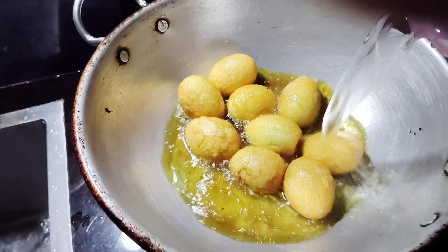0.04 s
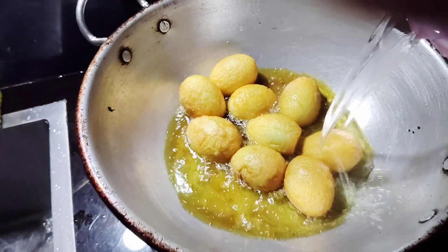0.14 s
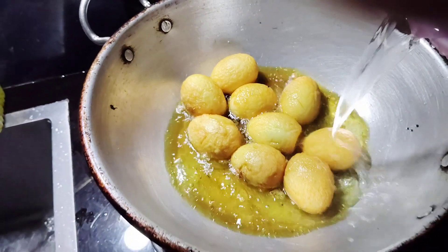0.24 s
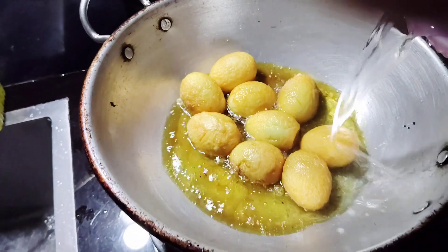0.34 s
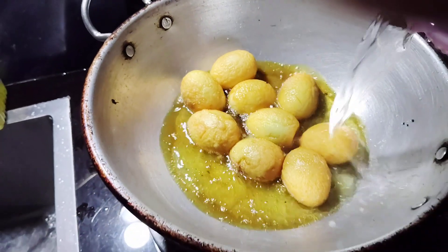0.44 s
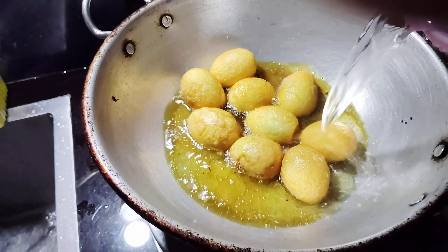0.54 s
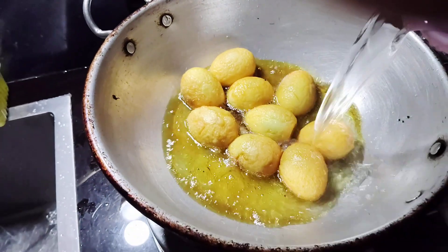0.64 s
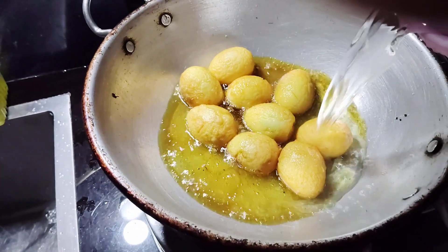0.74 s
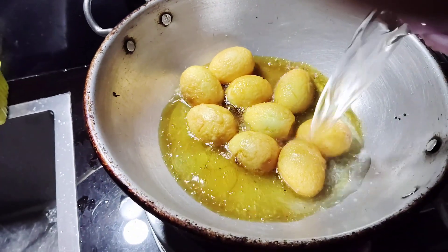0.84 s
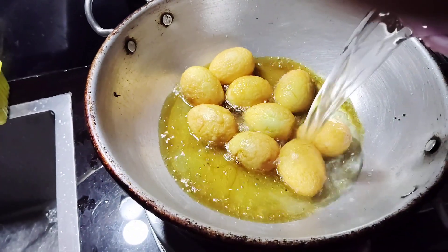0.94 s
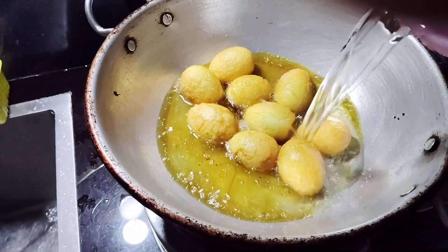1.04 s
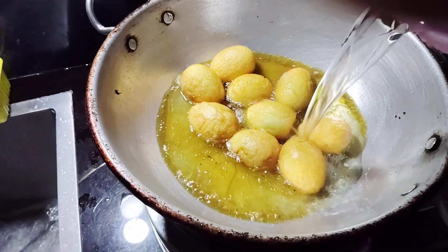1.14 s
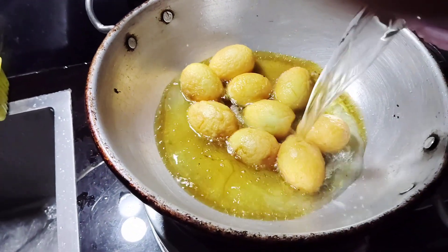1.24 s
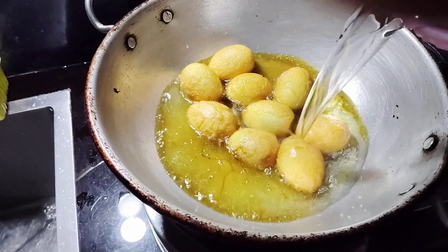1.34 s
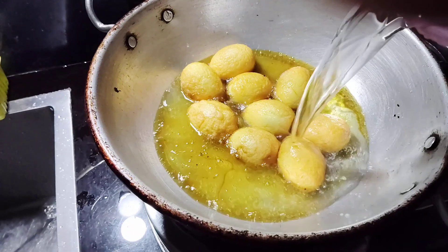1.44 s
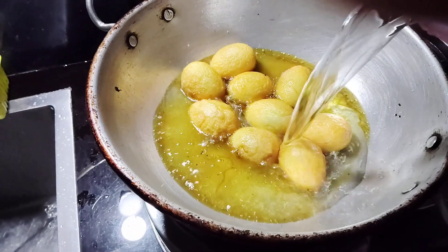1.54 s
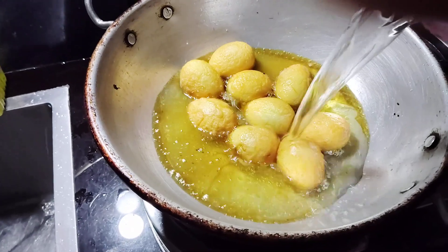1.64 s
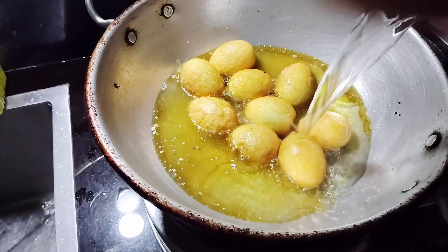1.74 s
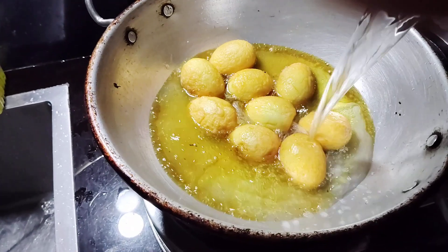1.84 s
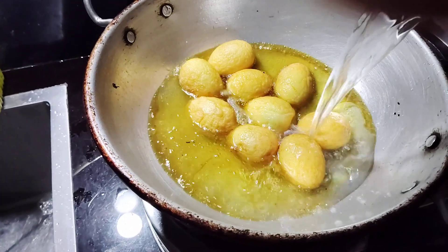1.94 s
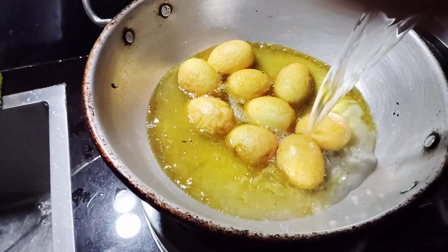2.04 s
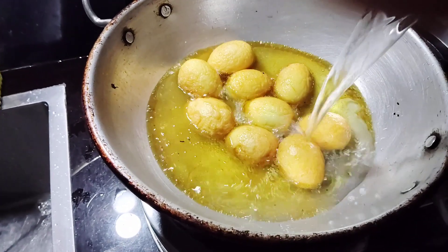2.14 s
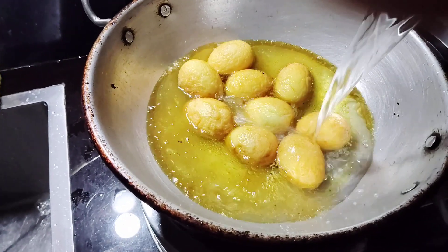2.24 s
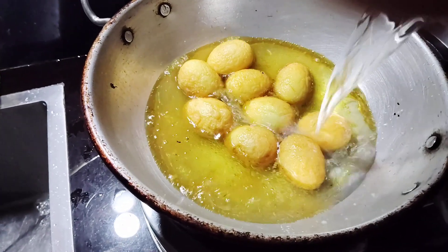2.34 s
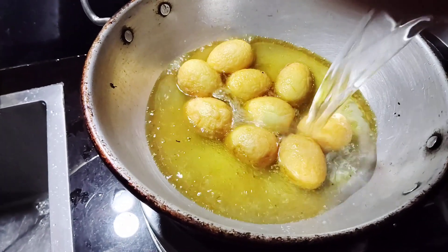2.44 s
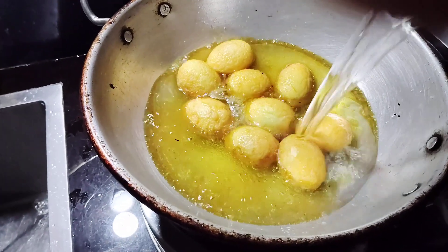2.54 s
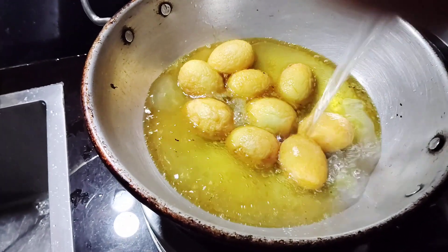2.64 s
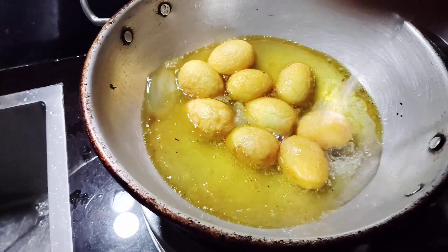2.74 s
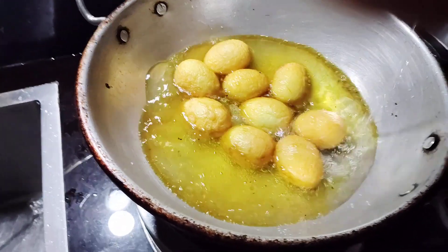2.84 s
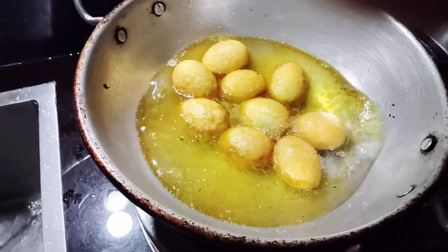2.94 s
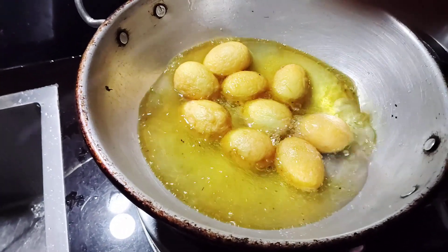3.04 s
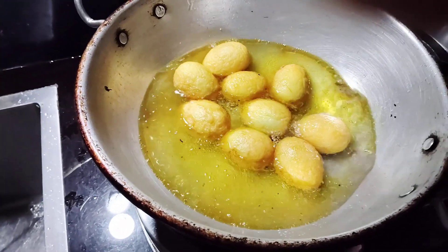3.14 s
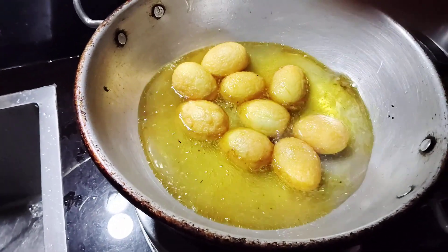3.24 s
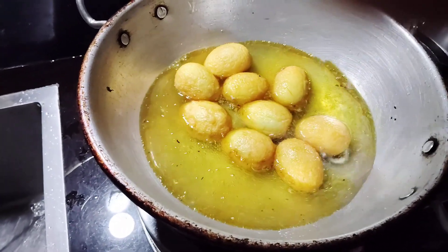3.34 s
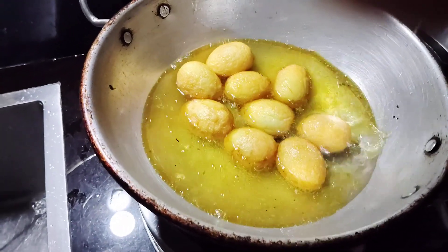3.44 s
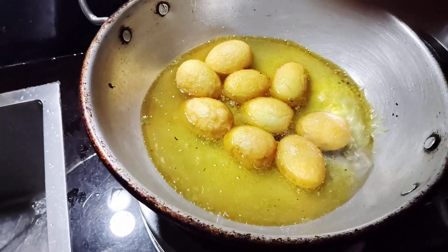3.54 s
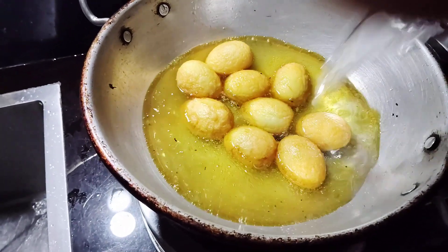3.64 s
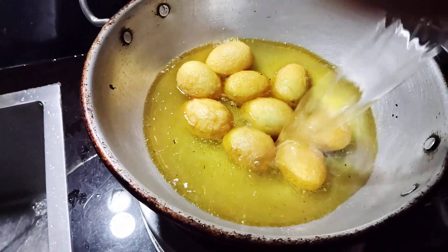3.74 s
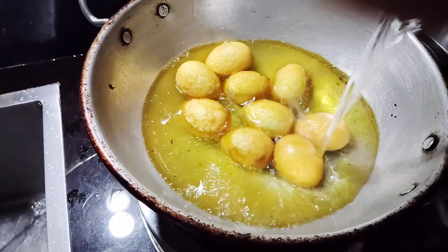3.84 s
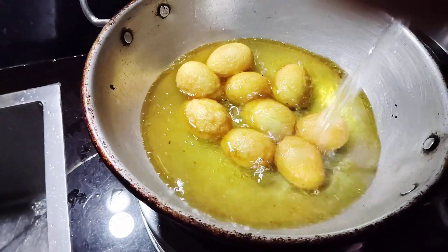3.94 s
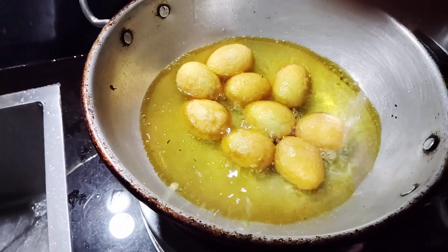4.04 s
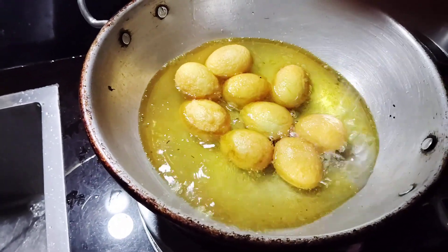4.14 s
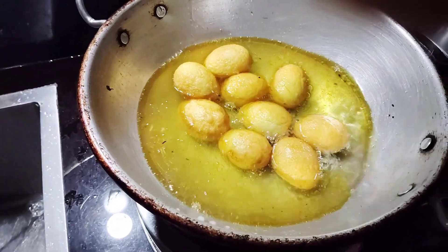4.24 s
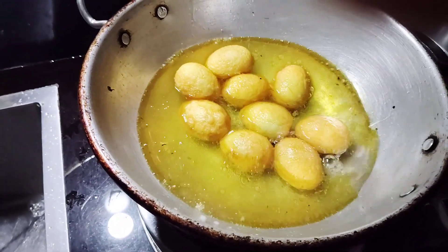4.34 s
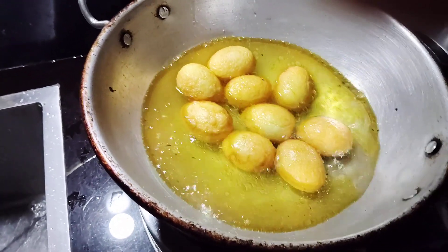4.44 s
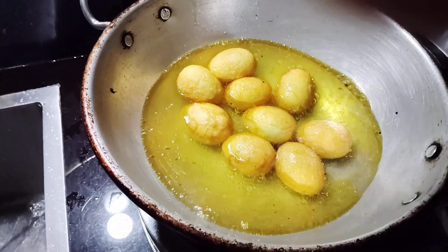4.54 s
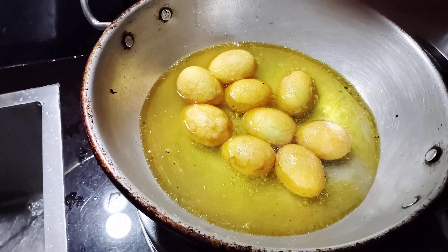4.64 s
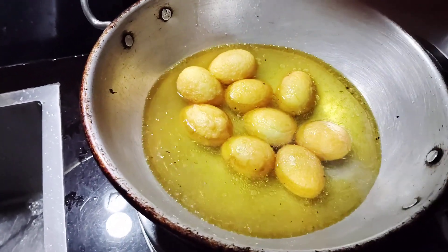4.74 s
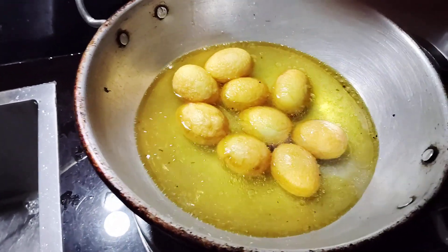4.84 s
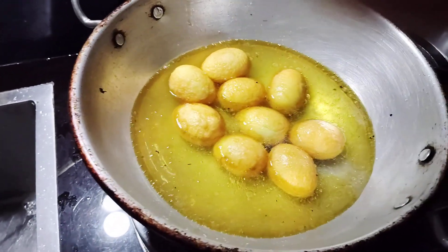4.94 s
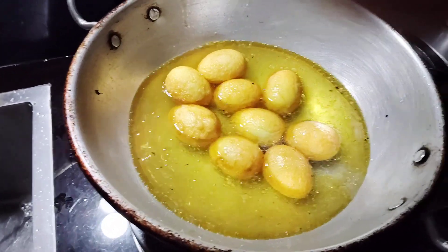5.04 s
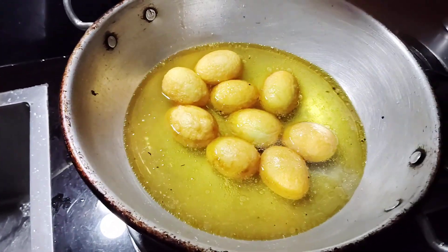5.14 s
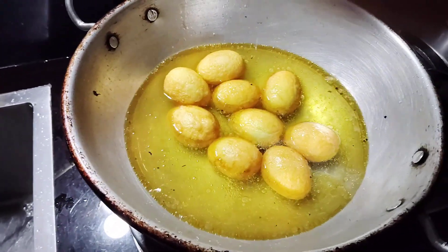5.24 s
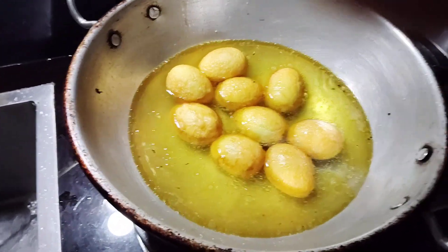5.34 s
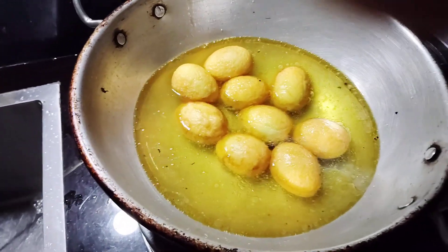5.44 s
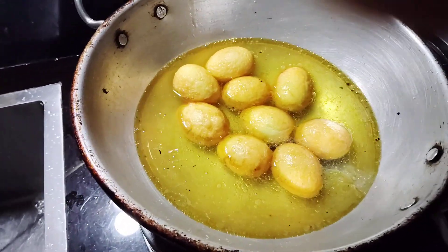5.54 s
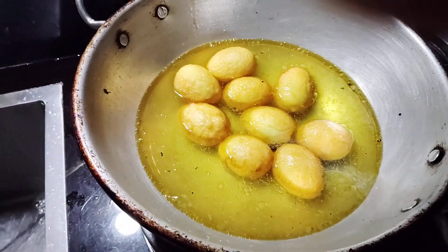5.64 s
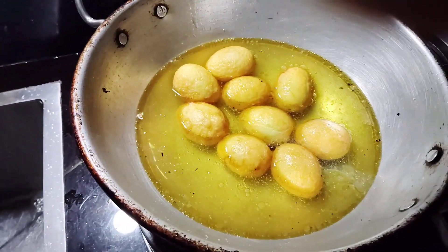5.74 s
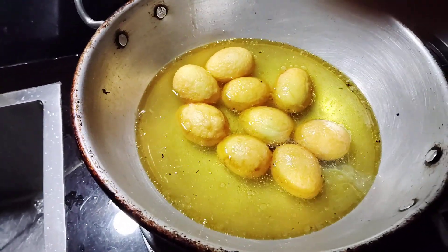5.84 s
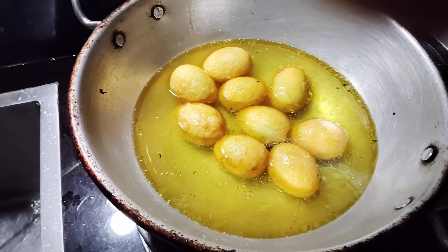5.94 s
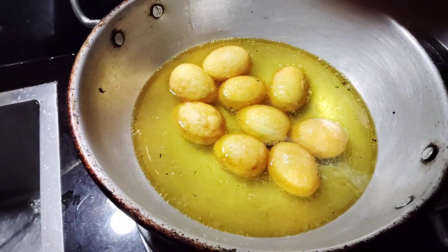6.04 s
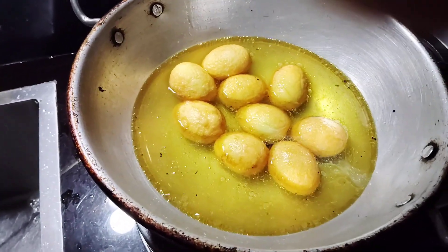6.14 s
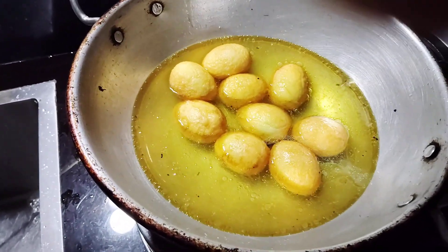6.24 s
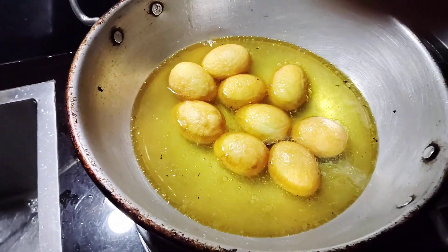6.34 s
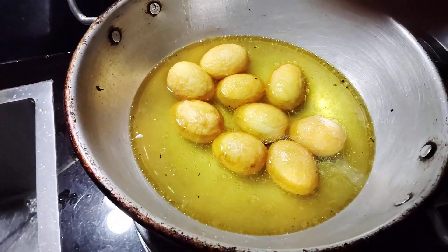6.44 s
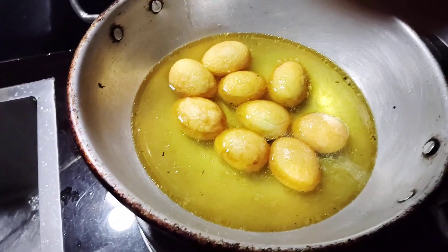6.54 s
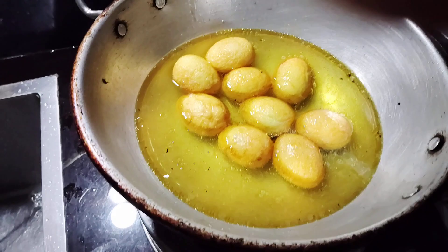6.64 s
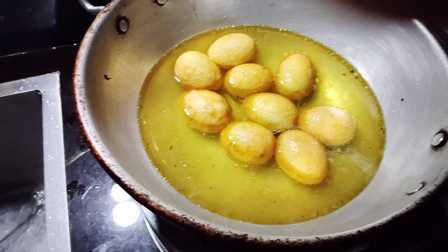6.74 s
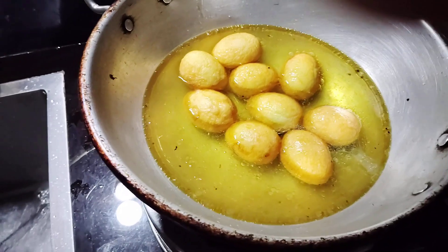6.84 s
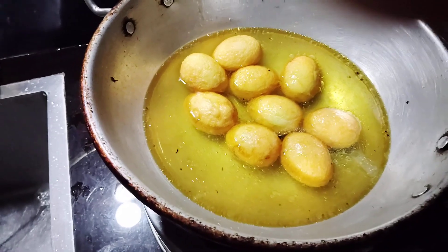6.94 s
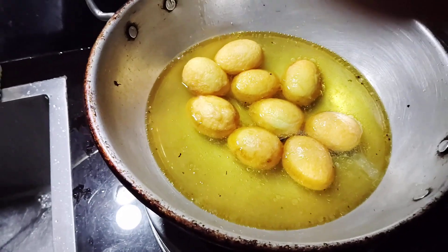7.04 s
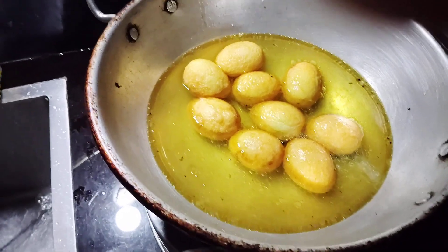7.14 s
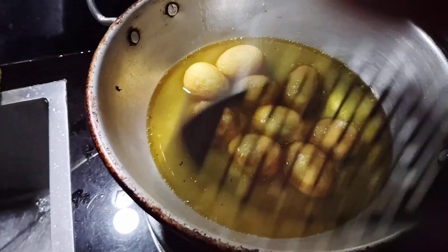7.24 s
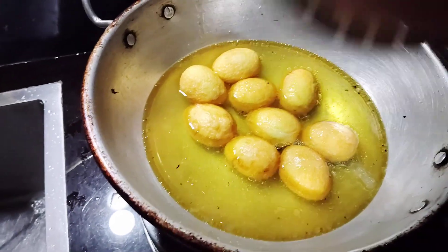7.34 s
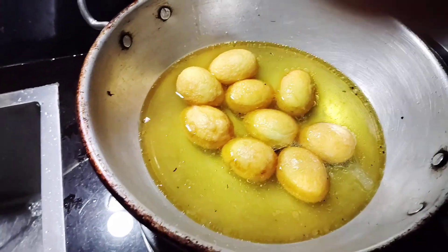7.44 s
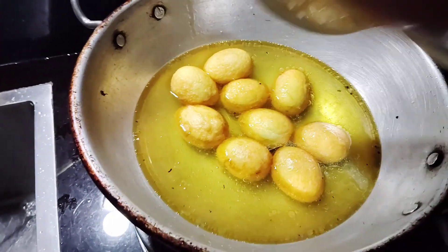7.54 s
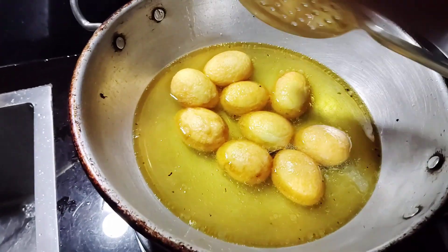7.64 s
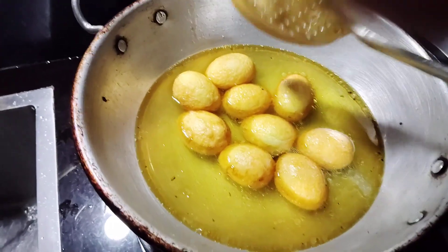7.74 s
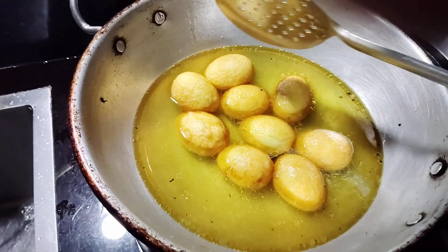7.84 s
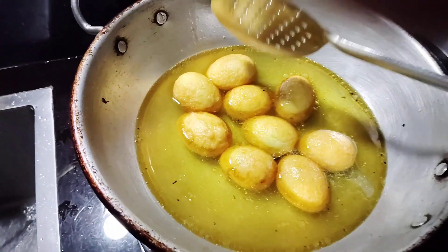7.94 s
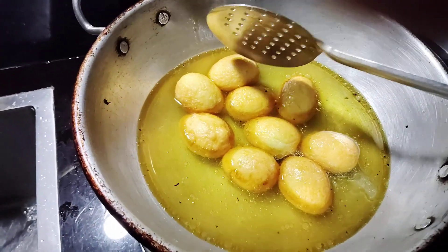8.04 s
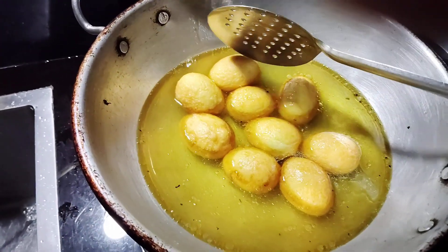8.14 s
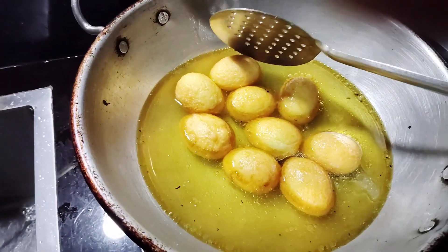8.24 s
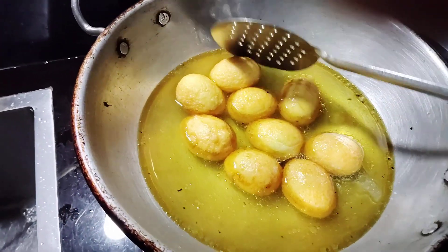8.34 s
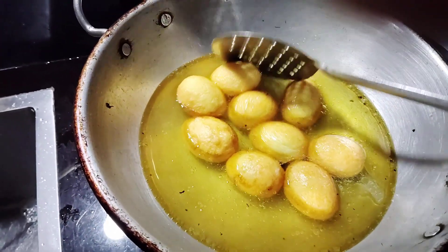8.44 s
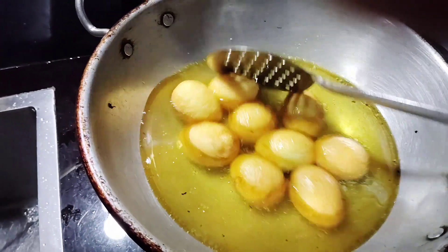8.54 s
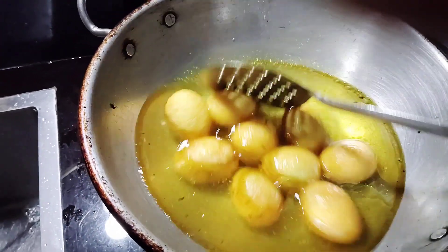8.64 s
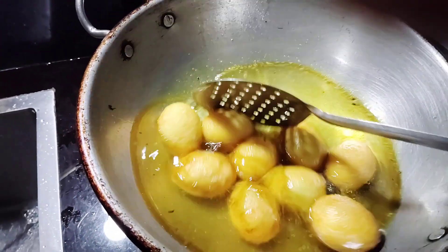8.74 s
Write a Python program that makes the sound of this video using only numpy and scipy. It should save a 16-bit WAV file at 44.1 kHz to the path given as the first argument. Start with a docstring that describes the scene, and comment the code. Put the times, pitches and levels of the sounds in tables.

```python
"""In a kitchen, a phone close to a metal pan: cold water streams into hot oil; the boil calms to single pops.
Bursting steam pockets click and ring: dense random bursts make the roar, cracks and bubbles the spits.
The pan's resonances colour the boil, near reflections surround it, a burner and kitchen hum lie underneath.
The brightest snaps overload the phone's limiter, which turns everything down for a moment."""
import sys
import numpy as np
from scipy import signal
from scipy.fft import rfft, irfft
from scipy.io import wavfile
from scipy.ndimage import uniform_filter1d, minimum_filter1d

SR = 44100
rng = np.random.default_rng(int(sys.argv[2]) if len(sys.argv) > 2 else 0)


def unload_wav(signal):
    """Save mono or channel-first audio to the path in sys.argv[1] as 16-bit WAV at rate SR, clipped to [-1, 1]."""
    wavfile.write(
        sys.argv[1],
        SR,
        np.round(np.clip(np.atleast_2d(signal).T, -1, 1) * 32767).astype(np.int16),
    )


N = 388080
POUR_END_S = 2.14  # the stream of water stops


def undb(db):
    """Decibels to an amplitude factor."""
    return 10 ** (np.asarray(db) / 20)


def unit(x):
    """Scale to an rms of 1."""
    return x / np.sqrt(np.mean(x ** 2))


def ring_down(t, t60_s):
    """Exponential decay that loses 60 dB in t60_s."""
    return np.exp(-np.log(1000) * t / t60_s)


def band(x, hz, width_hz):
    """Two-pole resonance, gain 1 at the centre."""
    return signal.lfilter(*signal.iirpeak(hz, hz / width_hz, fs=SR), x)


def high_pass(x, order, hz):
    """Butterworth filter that removes the lows."""
    return signal.sosfilt(signal.butter(order, hz, "high", fs=SR, output="sos"), x)


def walk(rate):
    """Random levels held 1 / rate s and slewed twice; spread near 1."""
    step = int(SR / rate)
    held = np.repeat(rng.standard_normal(N // step + 1), step)
    return 1.275 * uniform_filter1d(uniform_filter1d(held, step), step)[:N]


def heat(t):
    """Gurgle and fizz levels in dB: a slow course of the boil with short swells and dips on top."""
    # The slow course. Each row: time in seconds, gurgle level in dB, fizz level in dB.
    boil_course = [(0.0, -30, -19.5), (0.7, -31.5, -20), (1.0, -30, -20.5), (1.3, -26, -17.5),
                   (2.001, -27.5, -18.5), (2.45, -24.5, -22.5), (2.62, -29.5, -26), (3.2, -32, -31),
                   (3.35, -34.5, -30.5), (3.798, -30.5, -34.5), (3.921, -30.5, -26), (4.2, -35.5, -26),
                   (4.48, -31, -26), (4.65, -42, -37.5), (5.1, -44.5, -43.5), (5.4, -43.5, -48.5),
                   (6.1, -46.5, -52.5), (7.0, -53.5, -56.5), (7.8, -54.5, -63), (8.5, -59, -64),
                   (8.8, -47.5, -50)]
    # Short swells and dips of the boil's level on top of the slow course.
    # Each row: time in seconds, gurgle change in dB, fizz change in dB (negative is a dip).
    swells_and_dips = [(.12, 0.5, -0.5), (.34, -0.5, 2), (.65, 1, 0), (.76, 6.5, 2.5), (.89, -0.5, 0.5),
                       (1.14, 2, 1), (1.38, 1.5, 0), (1.53, 0, -1.5), (1.72, -2, -2), (1.95, 0.5, -3),
                       (2.198, 2.5, -1), (2.4, 1.5, -1.5), (2.9, 4, 5.5), (3.03, -0.5, 1), (3.5, 3, 2),
                       (3.75, 0, -0.5), (4.3, 3, 0), (4.68, 5.5, 3), (4.9, 9.5, 8), (5.0, 2, 6),
                       (5.15, 1, 0.5), (5.3, 8.5, 6), (5.58, 10.5, 3), (5.659, 6, 4), (5.9, 6, 1),
                       (6.0, -1, 7), (6.401, 8, 4), (6.6, 1.5, 9.5), (7.0, 1, 1), (7.2, 7, 0),
                       (7.4, 14, 9.5), (7.71, 5.5, 13), (7.9, 0, 6), (8.2, 0, 9.5), (8.3, 3, 7),
                       (8.4, -3, 11), (8.7, 1.5, 4)]
    onset_s, return_s = 0.054, .1
    s, *slow = np.transpose(boil_course)
    at, *changes = np.transpose(swells_and_dips)
    coarse = np.arange(0, N / SR, 1 / 200)
    since = coarse[:, None] - at
    bump = np.clip(np.minimum(1 + since / onset_s, 1 - since / return_s), 0, 1)
    return [np.interp(t, s, level) + np.interp(t, coarse, bump @ change) for level, change in zip(slow, changes)]


def bursts(per_s, spread_db):
    """Random impulses, a few much larger than the rest; mean power stays 1 whatever their rate."""
    when, big = rng.random(N), rng.uniform(-1, 1, N)
    chance = np.clip(per_s / SR, 1e-4, 1)
    hit = when < chance
    size = undb(spread_db * np.minimum(-np.log(np.abs(big[hit]) + 1e-9), 4.5))
    out = np.zeros(N)
    out[hit] = np.sign(big[hit]) * unit(size) / np.sqrt(chance[hit])
    return out


def bubbles(colour, per_s, spread_db, cycles, together, flicker_db):
    """Bubbles of many sizes: each quarter octave rings with its own bursts and with clicks that all sizes share."""
    hz, db = np.transpose(colour)
    shared = bursts(per_s, spread_db)
    out = 0
    for f in hz[0] * 2 ** np.arange(0, np.log2(hz[-1] / hz[0]), 1 / 4):
        push = np.sqrt(together) * shared + np.sqrt(1 - together) * bursts(per_s, spread_db)
        gain = undb(np.interp(np.log(f), np.log(hz), db) + flicker_db * walk(18))
        out = out + gain * np.sqrt(cycles) * band(push, f, f / cycles)
    return unit(out)


def pan_ring(x):
    """Each ring of the pan slides between a lower and a higher place as the water sloshes, and comes and goes."""
    # Resonances of the pan. Each row: frequency in Hz, width in Hz, gain in dB before the flicker.
    pan_modes = [(645, 60, -3), (1020, 90, 1.5), (1535, 90, 1.5), (5500, 130, -2)]
    drift, flicker_db = 0.39, 5  # drift is a share of each width
    out = 0
    for f, width, db in pan_modes:
        up = np.clip(.5 + 1.2 * walk(4.94), 0, 1)
        higher = band(x, f + drift * width, width)
        lower = band(x, f - drift * width, width)
        out = out + undb(db + flicker_db * walk(7)) * (up * higher + (1 - up) * lower)
    return out


def boil():
    """The harder it boils, the denser the bursts: a smooth roar at first, separate crackles at the end."""
    # Colour of the large bubbles. Each row: frequency in Hz, relative level in dB per Hz.
    gurgle_colour = [(150, -63), (220, -3.5), (400, -9), (620, -4.5), (800, -13), (1300, -6), (2000, -6.5),
                     (3000, -7.5), (4200, -13)]
    # Colour of the fine bubbles. Each row: frequency in Hz, relative level in dB per Hz.
    fizz_colour = [(2500, -3.5), (4200, -7.5), (6000, 0), (7400, -27), (9200, 17), (11500, -16),
                   (15000, -35), (16500, -18)]
    t = np.arange(N) / SR
    gurgle_db, fizz_db = heat(t)
    # steam leaves in gusts, more fitfully once the stream has stopped and the pan simmers
    surge = undb(np.interp(t, [4.3, 5.5], [1.19, 3.5]) * walk(60))
    gurgle_per_s = 200 + 2500 * undb(.8 * (gurgle_db + 27))
    gurgle = bubbles(gurgle_colour, gurgle_per_s, spread_db=6.5, cycles=6.5, together=0.13, flicker_db=2.5)
    fizz_per_s = 900 + 9000 * undb(.9 * (fizz_db + 23.0))
    fizz = bubbles(fizz_colour, fizz_per_s, spread_db=6.0, cycles=3.3, together=0.23, flicker_db=0.2)
    mix = surge * (undb(gurgle_db) * gurgle + undb(fizz_db) * fizz)
    # under the running stream the finest crackle is muffled
    muffled = np.interp(t, [POUR_END_S, POUR_END_S + 0.78], [.35, 0])
    mix = mix - muffled * band(mix, 11400.0, 6500.0)
    # low drumming goes with the stream: a share of that band leaves when it stops
    drumming_lost = np.interp(t, [POUR_END_S + 0.19, POUR_END_S + 0.25], [0, 0.55])
    mix = mix - drumming_lost * band(mix, 340, 220)
    # the stream drums on the pan; once it stops, the water lying in it damps the ring
    ring = undb(np.interp(t, [POUR_END_S, POUR_END_S + 0.29], [0, -15]))
    return 0.55 * (mix + ring * pan_ring(mix))


def small(layer, count, over_db, spread_db, low_hz, high_hz):
    """Rows (s, level dB, ring Hz) of spits at random moments that follow the level of the boil."""
    when, big, size = rng.random((count, 3)).T
    s = when ** 1.3 * 5.5  # crowded into the early, hard boil; none after 5.5 s
    db = heat(s)[layer] + over_db + spread_db * np.minimum(-np.log(big + 1e-9), 2)
    return np.transpose([s, np.minimum(db, -18), low_hz * (high_hz / low_hz) ** size])


def ragged(t, hz, steps):
    """The skin of oil keeps quivering after a burst: a faint uneven ring at the same pitch."""
    uneven = np.interp(t, np.linspace(0, t[-1], len(steps)), steps)
    return uneven * np.sin(2 * np.pi * hz * t) * np.exp(-t / 0.013)


def crack_spits():
    """Spitting oil: a bright tick with a short ring, shorter the higher its pitch."""
    # Cracks placed one by one, loud and faint.
    # Each row: time in seconds, level in dB before the cap below, ring in Hz.
    placed_cracks = [(0.097, -6, 5740), (0.129, -7, 8700), (0.236, -10, 8900), (0.373, -18, 9400),
                     (0.4447, -9, 9050), (0.482, -8, 9600), (0.502, -9, 9900), (0.5416, -15, 5700),
                     (0.558, -5, 9100), (0.6472, -21, 9400), (0.7787, -4, 10100), (0.885, -6, 9900),
                     (1.0216, -3.5, 11800), (1.166, -12, 9700), (1.1981, -2, 9400), (1.2656, 3, 12200),
                     (1.408, -13, 8700), (1.414, -9, 8700), (1.6715, -14, 10900), (1.819, -6, 8800),
                     (1.8373, -9, 8300), (1.9728, -10, 12570), (2.1093, -4, 11200), (2.1614, -16, 4430),
                     (2.2598, -7, 6360), (2.3118, -2, 8900), (2.398, -5, 9200), (2.493, -3, 8400),
                     (2.5067, -17, 7900), (2.5534, -14, 9400), (2.614, -15, 9400), (2.657, -9, 9300),
                     (2.6744, -13, 9000), (2.6927, -11, 9200), (2.744, -2, 10200), (2.7808, -18, 9100),
                     (2.793, -18, 8300), (2.8031, -20, 9200), (2.832, -20, 9300), (2.847, -15, 10100),
                     (2.866, 0, 11100), (2.902, -5, 10300), (2.926, -6, 9900), (3.0016, -19, 10000),
                     (3.008, -18, 12200), (3.02, -12, 10900), (3.0335, -11, 9400), (3.117, -23, 9200),
                     (3.1335, -10, 9400), (3.15, -11, 9300), (3.167, -18, 9400), (3.196, -11, 9600),
                     (3.229, -12, 10100), (3.2402, -8, 9400), (3.278, -5, 9700), (3.378, -22, 9000),
                     (3.4072, -17, 9500), (3.478, -11.5, 9250), (3.555, -14, 9800), (3.5649, -18, 9000),
                     (3.6284, -16.5, 8700), (3.6728, -16, 8750), (3.7293, -14.5, 8800), (3.7528, -16, 9600),
                     (3.812, -10.5, 9400), (3.835, -18, 8900), (3.844, -20, 8500), (3.8747, -5, 13400),
                     (3.8983, -11, 9200), (3.967, -11, 10500), (3.9842, -5, 9300), (4.0487, -7, 9200),
                     (4.0812, -16, 9100), (4.173, -16, 10200), (4.2383, -14, 8900), (4.3914, -4, 10300),
                     (4.4013, -15, 9300), (4.419, -13, 9600), (4.437, -14, 9000), (4.5122, -13, 8800),
                     (4.5433, -17, 5500), (4.574, -13, 9340), (4.5908, -13.5, 9600), (4.624, -25, 9050),
                     (4.6877, -17, 9800), (4.7137, -20, 10500), (4.727, -16, 9000), (4.753, -11, 9000),
                     (4.7836, -18, 8800), (4.8118, -21, 8500), (4.83, -22, 9300), (4.8368, -18, 9700),
                     (4.857, -18, 10100), (4.8735, -14, 9200), (4.8998, -24, 9400), (4.9172, -16, 9600),
                     (4.9292, -23, 5000), (4.9384, -15, 9300), (4.9496, -12, 9300), (5.0025, -25, 9600),
                     (5.0208, -19, 9500), (5.0733, -18.5, 9000), (5.094, -29, 9600), (5.1333, -25, 9600),
                     (5.1422, -26, 8900), (5.1483, -19, 3800), (5.195, -24, 3770), (5.2605, -20, 4200),
                     (5.58, -25, 4500), (5.773, -24, 3700), (5.973, -27, 4030), (7.883, -25, 6500),
                     (7.915, -34, 6460), (5.1703, -23, 8800), (5.2065, -24, 8950), (5.2161, -32, 11900),
                     (5.2368, -37, 9000), (5.256, -18, 10200), (5.2739, -17, 11700), (5.286, -15, 9150),
                     (5.294, -17, 10440), (5.3125, -26, 4240), (5.321, -19, 4500), (5.334, -14, 10400),
                     (5.407, -27, 8300), (5.4632, -29, 5100), (5.483, -25, 9350), (5.5207, -30, 9000),
                     (5.5412, -26, 7500), (5.601, -21, 4000), (5.619, -21, 4750), (5.653, -13.5, 9500),
                     (5.6674, -17.5, 9000), (5.742, -36, 9200), (5.756, -21.5, 4370), (5.784, -23, 10900),
                     (5.8368, -23, 9000), (5.8494, -23.5, 9600), (5.857, -18, 10300), (5.8763, -20, 9000),
                     (5.8863, -25, 8800), (5.8934, -20, 9900), (5.9296, -19.5, 5260), (5.9507, -28, 9450),
                     (6.0048, -22, 9900), (6.0414, -19, 4220), (6.0512, -28, 6800), (6.0875, -19.5, 7140),
                     (6.094, -33, 5700), (6.1248, -25, 10500), (6.1376, -34, 4580), (6.1987, -30, 9400),
                     (6.232, -31, 9400), (6.2692, -34, 5400), (6.2766, -17.5, 5600), (6.3127, -33, 12000),
                     (6.3622, -32, 5300), (6.401, -24, 6260), (6.4096, -23, 8800), (6.4532, -39, 3820),
                     (6.5047, -20, 9200), (6.5648, -37, 3800), (6.5698, -27, 4200), (6.6112, -22.5, 4000),
                     (6.6807, -26, 9200), (6.7057, -33, 9700), (6.7292, -32, 12300), (6.7446, -25.5, 7060),
                     (6.7775, -24.5, 5750), (6.7853, -29, 9100), (6.8171, -19.5, 5570),
                     (6.8343, -23.5, 8560), (6.8494, -26, 5900), (6.8818, -21, 8700), (6.9114, -31, 10800),
                     (6.9163, -25, 9600), (6.9227, -23, 9500), (6.9563, -27, 9500), (6.9663, -26, 4140),
                     (6.9775, -31, 7300), (6.9973, -36, 9400), (7.0357, -15, 4530), (7.057, -18, 9300),
                     (7.137, -30, 10500), (7.149, -33, 11500), (7.168, -33, 4850), (7.18, -29, 10400),
                     (7.2088, -28, 8700), (7.2507, -34, 5640), (7.2748, -34, 8550), (7.288, -15.5, 9400),
                     (7.2956, -19.5, 10400), (7.363, -29, 9300), (7.372, -29, 9200), (7.3892, -17.5, 11600),
                     (7.397, -30, 4700), (7.419, -21, 7100), (7.487, -15.5, 8800), (7.5775, -39, 5000),
                     (7.5886, -29, 9700), (7.5946, -38, 10100), (7.6173, -40, 9600), (7.625, -28, 9200),
                     (7.6412, -16.5, 6160), (7.6814, -39, 4200), (7.696, -27.5, 10000), (7.7, -33, 9800),
                     (7.707, -32, 10400), (7.7337, -33, 3900), (7.7435, -39, 8800), (7.845, -24.5, 9500),
                     (7.872, -33, 5170), (7.883, -23, 4900), (7.9214, -30, 4530), (7.933, -26.5, 6600),
                     (7.961, -36, 8800), (7.9896, -36, 5800), (8.026, -36, 8400), (8.0377, -28, 10200),
                     (8.1164, -29, 5730), (8.132, -24, 5570), (8.1495, -34, 10100), (8.1783, -30, 9100),
                     (8.2796, -37, 8130), (8.35, -40, 9100), (8.4027, -39, 9100), (8.41, -25.5, 5500),
                     (8.4753, -30.5, 8000), (8.5549, -37, 10600), (8.604, -36, 8650), (8.6151, -34, 5500),
                     (8.6373, -32, 9000), (8.662, -31, 8900), (8.6849, -27, 9900), (8.692, -23, 9000),
                     (8.7071, -20, 11000), (8.7219, -37, 9300), (8.739, -21, 10500), (8.747, -28, 8700),
                     (8.7589, -25, 9650), (8.7818, -20.5, 6000), (1.9579, -8, 11200), (3.4611, -13, 8440),
                     (3.5069, -19, 5650), (3.8583, -18, 9650), (4.0049, -17, 11100), (5.6365, -24, 6200),
                     (5.809, -24, 11200), (5.8665, -23, 10160), (6.3012, -29, 9200), (7.1891, -38, 12200),
                     (7.3314, -29, 9700), (8.132, -28, 9650)]
    cap_db, hard_db = -8.5, -18
    t60_s, low_rings_longer = 1.99e-3, 0.72  # ring time at 9 kHz, power of the pitch that shortens it
    out, t = np.zeros(N + 2048), np.arange(2048) / SR
    scattered = small(layer=1, count=70, over_db=18, spread_db=2.5, low_hz=5000, high_hz=13000)
    cracks = np.vstack([scattered, placed_cracks])
    chance = rng.standard_normal((len(cracks), 129))
    noises = chance[:, 1:65] - 0.11 * chance[:, :64]
    for (s, db, hz), noise, steps in zip(cracks, noises, chance[:, 65:]):
        crack = np.sin(2 * np.pi * hz * t) * ring_down(t, t60_s / (hz / 9000) ** low_rings_longer)
        # the ring swells over about half a cycle, which keeps it free of treble
        crack = crack * (1 - np.exp(-(t * hz / .5) ** 2)) * 1.13
        # small high cracks spray more treble than large low ones, and faint cracks are purer
        spray = np.clip(1 + (db - hard_db) / 20, .25, 1)
        crack[:64] += 0.71 * spray * (hz / 9000) ** 2.4 * noise * np.exp(-t[:64] / 0.00028)
        crack[0] += 0.14 * spray * (hz / 9000) ** 1.8  # the burst itself, heard in every band
        quiver = 0.059 * (9000 / hz) ** 0.85 * ragged(t, hz, steps)
        i = int(s * SR)
        out[i:i + 2048] += undb(min(db, cap_db)) * (crack + quiver)
    return out[:N]


def bubble_spits():
    """A bubble opens with a dull slap, then rings and rises a little in pitch."""
    # Bubbles placed one by one, loud and faint.
    # Each row: time in seconds, level in dB, starting ring in Hz, t60 in ms (1.5 at least).
    placed_bubbles = [(0.05, -16, 3640, 4.9), (.115, -15, 3380, 11), (0.327, -21, 1510, 30),
                      (0.3553, -16.5, 2680, 9), (.379, -18, 3490, 12), (0.446, -12.5, 1140, 6.5),
                      (0.479, -20, 1520, 19), (.592, -17, 1570, 5.4), (0.6505, -9.5, 1450, 11),
                      (0.6585, -23, 1510, 28), (.743, -17, 1570, 17), (.751, -22.5, 1005, 32),
                      (0.8286, -21, 1050, 11), (1.096, -18, 1540, 14), (1.247, -21, 1480, 43),
                      (1.2639, -7, 980, 7.6), (1.2926, -18, 1560, 17), (1.32, -22, 1550, 24),
                      (1.393, -12.5, 1500, 9.1), (1.52, -9.5, 1500, 4.8), (1.656, -12.5, 2500, 2.7),
                      (1.788, -10, 2710, 4.5), (1.806, -16, 1800, 10), (1.9407, -8, 1410, 7.5),
                      (1.9496, -12, 1130, 7.2), (2.163, -14, 1550, 3.9), (2.175, -15, 2560, 6.4),
                      (2.233, -17, 1720, 24), (2.269, -12, 1540, 4), (2.332, -26, 1630, 16),
                      (2.395, -12, 3470, 8.8), (2.424, -19, 1380, 46), (2.4325, -13, 1060, 11),
                      (2.49, -15, 1460, 10), (2.695, -16, 2500, 6), (2.845, -21, 3540, 10),
                      (2.861, -20, 3240, 9.3), (2.88, -14, 2530, 10), (2.904, -21, 3140, 17),
                      (2.934, -20, 2020, 25), (2.9552, -16, 1036, 37), (2.972, -23, 1010, 43),
                      (2.9944, -14, 2670, 6), (3.073, -23.5, 2330, 29), (3.1312, -20, 2890, 3.5),
                      (3.1482, -10.5, 2950, 3), (3.171, -18, 1480, 13), (3.431, -19, 3280, 10),
                      (3.458, -16, 2980, 2), (3.482, -20, 1420, 7.3), (3.488, -22.5, 1180, 20),
                      (3.5922, -17, 3550, 7.6), (3.6354, -18, 2710, 10), (3.657, -12, 2680, 1.4),
                      (3.729, -20, 1640, 8.2), (3.7526, -12, 1260, 4.6), (3.7895, -13, 1440, 6.5),
                      (3.79, -15, 2660, 7.3), (3.819, -19, 2780, 12), (3.8236, -15, 1730, 5),
                      (3.8385, -17.5, 2550, 13), (3.851, -23, 4230, 10), (3.861, -20, 3900, 6),
                      (3.864, -22, 2600, 11), (3.874, -22, 3750, 10), (3.9484, -15, 3360, 4),
                      (3.964, -13, 3000, 12), (3.9857, -26, 2460, 12), (4.011, -20, 3770, 14),
                      (4.1212, -22, 2330, 3.6), (4.1918, -22, 1460, 3), (4.2383, -15, 3360, 2.4),
                      (4.322, -22, 2950, 25), (4.3823, -13, 2300, 3), (4.3988, -13, 1940, 4.6),
                      (4.4067, -17, 1820, 6.6), (4.452, -20, 1880, 17), (4.489, -17, 1840, 11),
                      (4.5374, -16.5, 3050, 4), (4.593, -21, 1700, 6.8), (4.646, -21.5, 3210, 11),
                      (4.6745, -18.5, 1350, 8.9), (4.738, -23, 1660, 5.9), (4.783, -24, 1940, 4),
                      (4.81, -21, 3070, 11), (4.8878, -21, 1770, 3), (4.914, -32, 1040, 8.4),
                      (4.9378, -15, 3060, 1.8), (4.951, -35, 1140, 8), (4.966, -28, 4710, 8),
                      (5.023, -28, 1150, 8), (5.067, -30, 4820, 8), (5.099, -27, 3570, 6),
                      (5.1374, -17.5, 2600, 17), (5.1716, -29, 1460, 5.4), (5.2006, -23, 1970, 7),
                      (5.239, -33, 2260, 7.4), (5.273, -24.5, 1560, 11), (5.29, -21.5, 3100, 9),
                      (5.292, -25.5, 670, 25), (5.3324, -14.5, 2300, 16), (5.341, -25, 2520, 22),
                      (5.35, -20, 3140, 9.7), (5.408, -22.5, 2680, 6), (5.439, -20, 2460, 2.6),
                      (5.438, -30, 1610, 4.4), (5.485, -21, 2580, 2.2), (5.553, -31, 3120, 10),
                      (5.573, -23, 2410, 5), (5.576, -18, 1480, 3.7), (5.589, -28, 3480, 9.1),
                      (5.599, -23, 2030, 12), (5.6, -26, 4200, 7), (5.618, -35, 4800, 8.8),
                      (5.6576, -14.5, 1625, 2.9), (5.689, -23.5, 3070, 8), (5.7578, -17.5, 1500, 3),
                      (5.809, -25.5, 825, 14), (5.8274, -20, 1470, 2.6), (5.8561, -20.5, 1690, 6.5),
                      (5.885, -20.5, 3100, 4), (5.9146, -29, 3340, 16), (5.9848, -26, 3660, 4.1),
                      (6.046, -26, 1700, 4), (6.05, -28, 2530, 5), (6.137, -38, 4540, 8),
                      (6.1632, -21.5, 3080, 7.1), (6.366, -17, 1080, 6.3), (6.386, -28, 4500, 7.4),
                      (6.453, -20.5, 3300, 9.3), (6.462, -29, 3200, 9), (6.5004, -26, 3020, 5.7),
                      (6.5648, -26, 3630, 2.2), (6.5811, -30, 3120, 14), (6.665, -29, 2530, 5),
                      (6.6804, -25, 1500, 5.6), (6.746, -25, 2200, 5.3), (6.797, -39, 5050, 8),
                      (6.8043, -24.5, 1500, 3.1), (6.8512, -20.5, 1500, 3.6), (6.869, -23, 1590, 5),
                      (6.87, -31, 2500, 17), (6.945, -22, 2990, 3.7), (6.946, -24, 1260, 17),
                      (6.953, -29.5, 910, 15), (6.935, -34, 5280, 8), (6.936, -33, 3600, 6),
                      (6.9666, -25, 3120, 1.6), (7.0345, -24.5, 915, 8.6), (7.0578, -28, 2300, 2.3),
                      (7.1408, -29, 2810, 33), (7.169, -23.5, 2920, 4.4), (7.2086, -46, 1520, 5),
                      (7.288, -26, 3700, 3.3), (7.314, -32, 5900, 8), (7.3776, -28, 3770, 6.7),
                      (7.3911, -23.5, 1190, 13), (7.389, -17, 2650, 4.3), (7.4874, -22.5, 1780, 1.5),
                      (7.578, -33, 1770, 3.3), (7.578, -32, 3100, 4), (7.673, -26, 2490, 2.5),
                      (7.697, -37, 3330, 8), (7.733, -34, 2410, 5), (7.7272, -38, 1090, 16),
                      (7.7914, -36, 1540, 4.1), (8.041, -33, 1780, 3.5), (8.178, -35, 3180, 5.1),
                      (8.2797, -26, 2800, 1.9), (8.334, -39, 2500, 2), (8.369, -30, 3400, 1.5),
                      (8.707, -20.5, 1490, 5), (8.738, -38, 1130, 13), (8.739, -35, 2080, 4),
                      (8.758, -31, 3560, 5), (8.7804, -29, 3500, 11), (0.3917, -19, 3400, 11),
                      (1.153, -21, 3445, 15), (2.2855, -21, 3800, 8), (2.3737, -21, 1530, 26),
                      (2.436, -15, 2110, 10), (3.0015, -23, 1780, 12), (3.053, -20, 2420, 10),
                      (3.2136, -18.5, 3620, 6), (3.7284, -20, 4300, 5), (3.8476, -21, 2580, 12),
                      (4.1581, -30, 4480, 12), (4.176, -27, 4550, 10), (4.7272, -25, 2760, 9),
                      (4.7378, -32, 4820, 10), (5.1932, -32, 1550, 7), (5.274, -26, 4650, 2),
                      (5.5816, -31, 3270, 9), (5.6093, -30, 4820, 11), (5.6346, -29, 4850, 8),
                      (5.6366, -27, 1550, 12), (5.649, -37, 3100, 14), (5.8481, -30, 2580, 8),
                      (5.9147, -25, 1720, 7), (5.9505, -29, 4650, 3), (6.1088, -38, 2580, 6),
                      (6.1189, -35, 1380, 9), (6.269, -27, 3790, 3), (6.3435, -33, 3800, 1.5),
                      (6.3727, -36, 3270, 7), (6.3786, -36, 3270, 6), (6.4482, -24.5, 2510, 15),
                      (6.7291, -35, 2930, 4), (7.0629, -33, 1380, 8), (7.109, -31, 2000, 2),
                      (7.2383, -40, 3445, 10), (7.2954, -39, 2240, 7), (7.4538, -41, 3270, 9),
                      (7.487, -26, 3790, 3), (7.7919, -37, 3445, 4), (8.335, -40, 5860, 5),
                      (8.37, -40, 7920, 5), (8.6148, -29, 3000, 3), (8.6621, -32, 3620, 2.8)]
    out, t = np.zeros(N + 2048), np.arange(2048) / SR
    scattered = small(layer=0, count=150, over_db=4.1, spread_db=1.7, low_hz=1000, high_hz=3600)
    scattered_t60_ms = 12.5 * rng.exponential(size=len(scattered))
    pops = np.vstack([np.c_[scattered, scattered_t60_ms], placed_bubbles])
    for (s, db, hz, t60_ms), steps in zip(pops, rng.standard_normal((len(pops), 32))):
        t60 = max(t60_ms, 1.5) / 1000
        shape = (1 - np.exp(-t * hz / 0.058)) * ring_down(t, t60)
        slap = 0.82 * np.exp(-t * hz * 4.7) * np.sin(np.pi * hz * t)
        bubble = shape * np.sin(2 * np.pi * hz * t * (1 + 0.056 * t / t60))
        i = int(s * SR)
        out[i:i + 2048] += undb(db) * (slap + bubble + 0.1 * ragged(t, hz, steps))
    return out[:N]


def thumps():
    """Dull pops that knock through the pan bottom: short sweeps that slide down in pitch."""
    # Each row: time in seconds, level in dB.
    dull_pops = [(0.085, -20), (0.154, -24), (0.332, -28), (0.389, -27), (0.474, -29), (0.591, -28),
                 (0.649, -27), (0.746, -21), (0.806, -28), (0.828, -21), (1.006, -24), (1.076, -23),
                 (1.129, -18), (1.227, -26), (1.264, -16), (1.361, -29), (1.519, -22), (1.611, -16),
                 (1.715, -23), (1.739, -18), (1.895, -28), (1.94, -18), (2.188, -31), (2.221, -27),
                 (2.268, -18), (2.423, -23), (2.49, -34), (2.606, -28), (2.668, -28), (2.692, -24),
                 (2.802, -25), (2.89, -22), (2.955, -27), (3.122, -32), (3.17, -24), (3.194, -28),
                 (3.289, -38), (3.354, -28), (3.428, -26), (3.458, -33), (3.481, -24), (3.508, -31),
                 (3.559, -40), (3.656, -28), (3.691, -22), (3.727, -29), (3.752, -30), (3.79, -16),
                 (3.823, -29), (3.969, -35), (4.19, -34), (4.238, -33), (4.325, -35), (4.369, -24),
                 (4.399, -29), (4.488, -30), (4.537, -38), (4.567, -27), (4.592, -35), (4.643, -41),
                 (4.672, -27), (4.727, -26), (4.783, -36), (4.86, -35), (4.873, -24), (4.914, -24.5),
                 (4.948, -22.5), (4.979, -29), (5.022, -32), (5.137, -27), (5.201, -38), (5.201, -29),
                 (5.239, -22), (5.272, -30), (5.289, -34), (5.33, -37), (5.402, -32), (5.438, -41),
                 (5.483, -27), (5.551, -27), (5.575, -36), (5.657, -23), (5.738, -43), (5.757, -38),
                 (5.809, -29), (5.854, -34), (6.367, -34), (6.447, -32), (6.5, -38), (6.665, -35),
                 (6.745, -37), (6.804, -38), (6.851, -28), (6.946, -40), (7.032, -29.5), (7.168, -35),
                 (7.208, -29.5), (7.287, -41), (7.388, -25), (7.487, -35), (7.672, -44), (7.725, -40),
                 (8.689, -39), (8.707, -38), (8.739, -35)]
    start_hz, end_hz, slide_s, t60_s = 2590, 607, 2.21e-3, 22.6e-3
    t, push = np.arange(1024) / SR, np.zeros(N)
    pitch = end_hz + (start_hz - end_hz) * np.exp(-t / slide_s)
    fade = (1 - np.exp(-t / 0.00062)) * ring_down(t, t60_s)
    s, db = np.transpose(dull_pops)
    push[(s * SR).astype(int)] = undb(db)
    return signal.fftconvolve(push, fade * np.sin(2 * np.pi * np.cumsum(pitch) / SR))[:N]


def sprays():
    """Bursts throw a spray of fine droplets: a grainy wide hiss that starts at once and dies away."""
    # Each row: time in seconds, peak of the burst in dB, t60 of the hiss in seconds.
    droplets = [(4.3904, -14, 0.06), (4.4354, -7, 0.06), (4.4871, -22, 0.06), (4.542, -10, 0.067),
                (4.5726, -2, 0.072), (4.6862, -12, 0.075), (4.751, -7, 0.073), (4.783, -11, 0.06),
                (4.8104, -22, 0.06), (4.8573, -7, 0.058), (4.917, -14, 0.06), (4.949, -14, 0.06),
                (5.02, -4.5, 0.095), (5.0923, -23, 0.06), (5.1316, -21, 0.06), (5.1691, -19, 0.06),
                (5.205, -18, 0.049), (5.256, -12, 0.054), (5.2938, -13, 0.049), (5.332, -13.5, 0.075),
                (5.4065, -24, 0.06), (5.4808, -12.5, 0.06), (5.5402, -34, 0.06), (5.651, -21, 0.06),
                (5.7562, -18, 0.072), (5.7835, -17, 0.13), (5.8361, -21, 0.06), (6.0401, -16, 0.06),
                (6.086, -12, 0.067), (6.1239, -24, 0.06), (6.1972, -35, 0.06), (6.2307, -31, 0.053),
                (6.301, -23, 0.06), (6.3349, -38, 0.06), (6.4083, -30, 0.06), (6.502, -14, 0.06),
                (6.5634, -25, 0.06), (6.6123, -33, 0.06), (6.728, -33, 0.055), (6.7839, -29, 0.06),
                (6.8333, -33, 0.06), (6.8807, -30, 0.06), (6.9156, -29, 0.07), (7.0556, -28, 0.047),
                (7.137, -22, 0.06), (7.2745, -25, 0.06), (7.3706, -30, 0.06), (7.388, -13, 0.066),
                (7.418, -27, 0.06), (7.4866, -14, 0.11), (7.5876, -31, 0.06), (7.6245, -31, 0.053),
                (7.681, -24, 0.071), (7.843, -24, 0.08), (7.9882, -26, 0.05), (8.0361, -33, 0.067),
                (8.1314, -31, 0.06), (8.5534, -39, 0.06), (8.6033, -21.5, 0.11), (8.6841, -19, 0.06),
                (8.738, -22, 0.06), (8.78, -22, 0.05)]
    under_burst_db = -25.5
    out, t = np.zeros(N + 4096), np.arange(4096) / SR
    for (s, db, t60), noise in zip(droplets, rng.laplace(size=(len(droplets), 4096))):
        i = int(s * SR)
        out[i:i + 4096] += undb(db + under_burst_db) * noise * ring_down(t, max(t60, .01))
    return band(out[:N], 8500, 17300)


def plops():
    """A large bubble rises to the surface: a soft tone climbs in pitch and shuts off as the bubble breaks."""
    # Each row: time in seconds, level in dB, start in Hz, end in Hz, length in ms.
    rising_bubbles = [(2.832, -26.5, 1740, 2220, 14), (4.281, -20.5, 1600, 1900, 12.5),
                      (4.2975, -25, 2580, 2730, 14), (6.376, -28.5, 1150, 1750, 16)]
    fade_db = -13  # over its length
    out = np.zeros(N)
    for s, db, start_hz, end_hz, ms in rising_bubbles:
        u = np.linspace(0, 1, int(ms * SR / 1000))
        shape = np.clip(np.minimum(u, 1 - u) * 8, 0, 1) * undb(db + fade_db * u)
        pitch = start_hz + (end_hz - start_hz) * u
        i = int(s * SR)
        out[i:i + len(u)] += shape * np.sin(2 * np.pi * np.cumsum(pitch) / SR)
    return out


def snaps():
    """Very bright snaps: a millisecond of ringing, mostly above the recorder's cut-off."""
    # Each row: time of the peak in seconds, level in dB.
    bright_snaps = [(0.237, 1.5), (0.446, 3.5), (0.503, 4), (0.782, -2.5), (1.0251, -1.5), (1.2, 0.3),
                    (1.4157, 4), (1.423, 6), (1.8221, 1.5), (2.399, 3), (2.5082, 3.5), (2.697, -0.7),
                    (2.868, 6.5), (2.904, 5), (3.2807, 2.5), (3.411, 0.5), (3.875, 2.5), (4.0504, -1),
                    (4.438, 3.5), (4.7564, 0.5), (5.297, 0)]
    out, t = np.zeros(N), np.arange(48) / SR
    for s, db in bright_snaps:
        i = int(s * SR) - 24
        out[i:i + 48] += undb(db) * np.hanning(48) * np.cos(2 * np.pi * 19500 * t)
    return out


def whistle():
    """A faint thin ring of metal: unsteady lines that fade within a third of a second."""
    # Each row: frequency in Hz, level at the onset in dB before it wavers.
    metal_lines = [(4050, -68), (5152, -69), (8446, -76), (10487, -63), (12250, -76), (12775, -72),
                   (13900, -76), (15434, -72)]
    start_s, length_s, fade_db_per_s = 8.185, .29, -38
    t = np.arange(N) / SR - start_s
    on = np.clip(np.minimum(t, length_s - t) / .015, 0, 1) * undb(fade_db_per_s * np.maximum(t, 0))
    out = 0
    for f, db in metal_lines:
        level = undb(db + 3.5 * walk(45))
        out = out + level * np.sin(2 * np.pi * f * np.cumsum(1 + .003 * walk(12)) / SR)
    return on * out


def room(x):
    """A few near reflections and a short, dull scatter."""
    # Pan wall, stove top, tiles. Each row: delay in ms, level in dB before the dulling filter.
    reflections = [(3.8, -43), (7.6, -46), (9.5, -35.5), (20.0, -21.5)]
    t = np.arange(8192) / SR
    tail = rng.standard_normal(8192) * ring_down(t, 0.02) * (t > .0015)
    response = undb(-12) * tail / np.sqrt(np.sum(tail ** 2))
    for ms, db in reflections:
        response[int(ms * SR / 1000)] += undb(db)
    return x + band(signal.fftconvolve(x, response)[:N], 5200.0, 13700.0)


def drone():
    """The main hum tone wanders a little in pitch and level; softer at first, it is full by 5.2 s."""
    hz, wander_hz, full_db = 264, 4.845, -47
    early_db = np.interp(np.arange(N) / SR, [POUR_END_S, 5.2], [-4, 0])
    level = undb(full_db + early_db + 1.56 * walk(14))
    return level * np.sin(2 * np.pi * np.cumsum(hz + wander_hz * walk(17)) / SR)


def kitchen():
    """Burner and kitchen: wavering narrow hum bands, growing while the stream runs, over a soft broad rush."""
    # Hum bands. Each row: frequency in Hz, noise bandwidth in Hz (about), full rms level in dB before it wavers.
    hum_bands = [(111.5, 7.9, -57), (128, 20, -58.5), (164.4, 12, -66), (228.4, 11, -57.5),
                 (264.9, 15.6, -47.5), (518, 25, -61.5), (660, 55, -62.5)]
    # Colour of the rush. Each row: frequency in Hz, relative level in dB per Hz.
    rush_colour = [(30, -15.5), (55, -17.5), (85, -26), (110, -14), (300, -1.5), (600, -9), (1270, -12),
                   (3860, -40), (9230, -37), (15200, -42)]
    hum = 0
    for f, width, db in hum_bands:
        level = undb(db + 0.95 * walk(5))
        narrow = band(band(rng.standard_normal(N), f, 1.33 * width), f, 1.33 * width)
        hum = hum + level * unit(narrow)
    hum = hum * undb(np.interp(np.arange(N) / SR, [0, POUR_END_S], [-4, 0]))
    hz, db = np.transpose(rush_colour)
    shape = undb(np.interp(np.log(np.fft.rfftfreq(N, 1 / SR) + 1), np.log(hz), db))
    rush = irfft(rfft(rng.standard_normal(N)) * shape, N)
    return hum + undb(-55.5) * unit(rush)


def bend(x):
    """Bending waves in the metal carry the lows more slowly, so each pop ends in a short downward hook."""
    warp = np.tan(np.pi * 550 / SR)  # all-pass chain turning at 550 Hz
    k = (1 - warp) / (1 + warp)
    return signal.sosfilt([[k * k, -2 * k, 1, 1, -2 * k, k * k]] * 4, x)


def scene():
    """Boil and spits sound through the pan and its surroundings; snaps, hums and whistle are added."""
    spitting = high_pass(crack_spits() + bubble_spits() + thumps() + sprays() + plops(), 2, 415)
    # the pan is too small to radiate deep bass
    pan = bend(high_pass(room(boil() + spitting), 4, 132))
    return (pan + snaps() + kitchen() + drone() + whistle())[None]


def record(dry):
    """The microphone port lifts the treble; the limiter drops to fit a peak under its ceiling, holds, lets go."""
    ceiling, hold_s, top_hz = .7, .094, 15900
    dry = dry + undb(-6.5) * band(dry, 9200, 1500)  # port resonance
    hold = int(hold_s * SR)
    need = np.minimum(1, ceiling / (np.abs(dry) + 1e-9))
    # the window reaches back over the hold and a few samples ahead
    gain = minimum_filter1d(need, size=hold, origin=(hold - 1) // 2 - 12, mode="nearest")
    gain = uniform_filter1d(gain, size=24)
    # the top is cut after the limiter, so snaps mostly above the cut still pull the level down
    return signal.sosfilt(signal.ellip(10, .2, 65, top_hz, fs=SR, output="sos"), dry * gain)


dry = scene()
out = record(dry)
unload_wav(out)
```